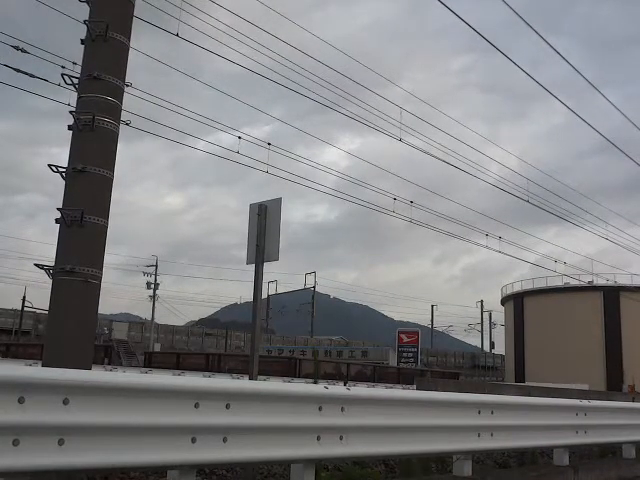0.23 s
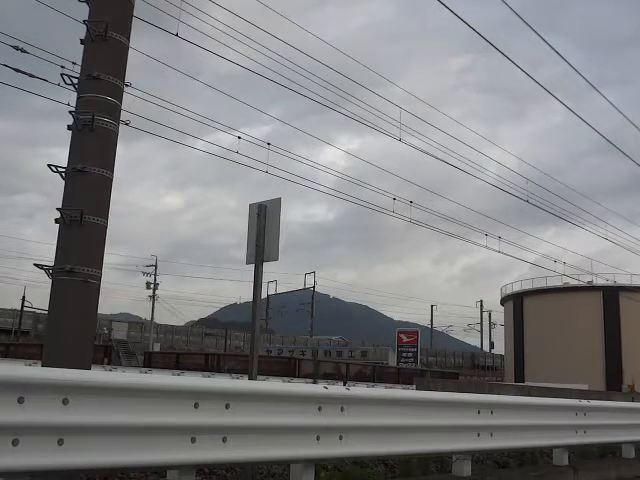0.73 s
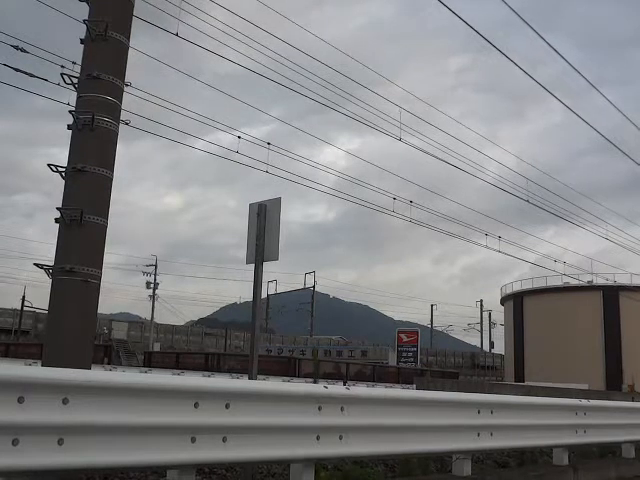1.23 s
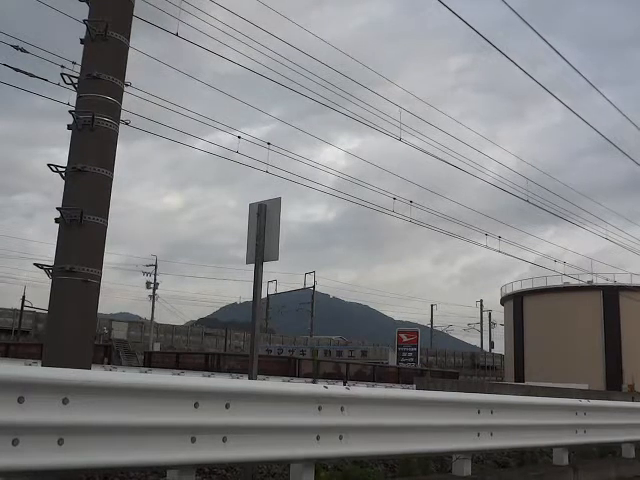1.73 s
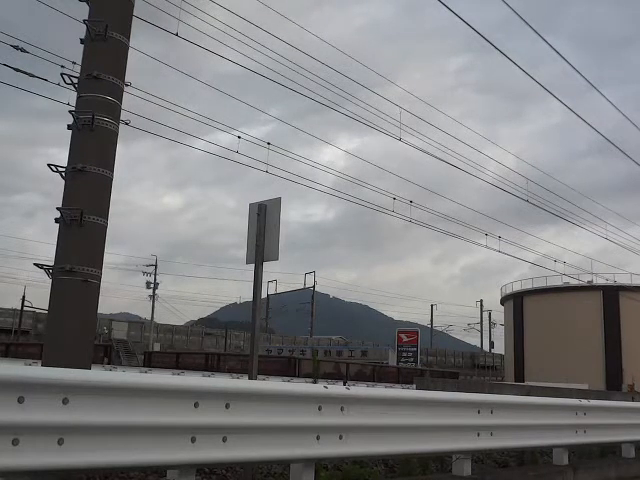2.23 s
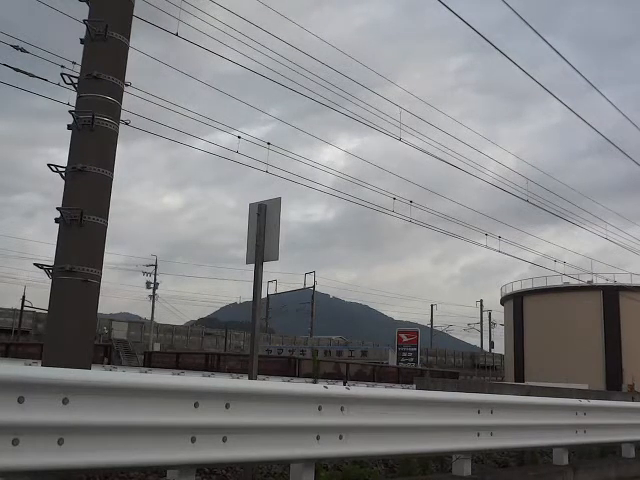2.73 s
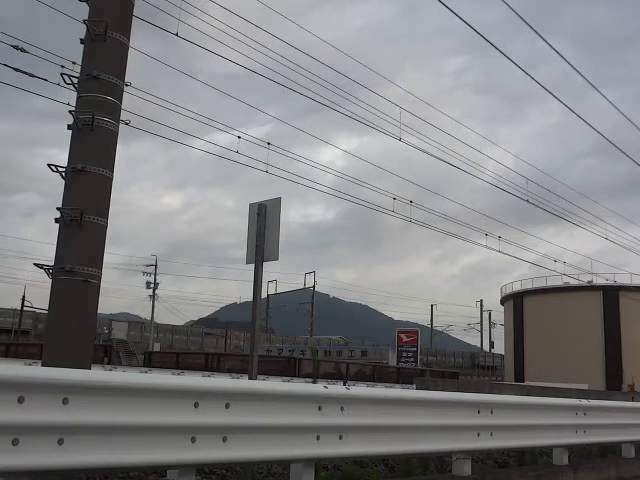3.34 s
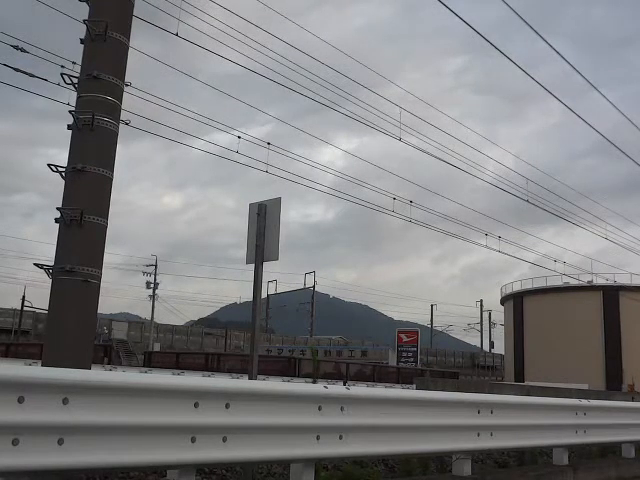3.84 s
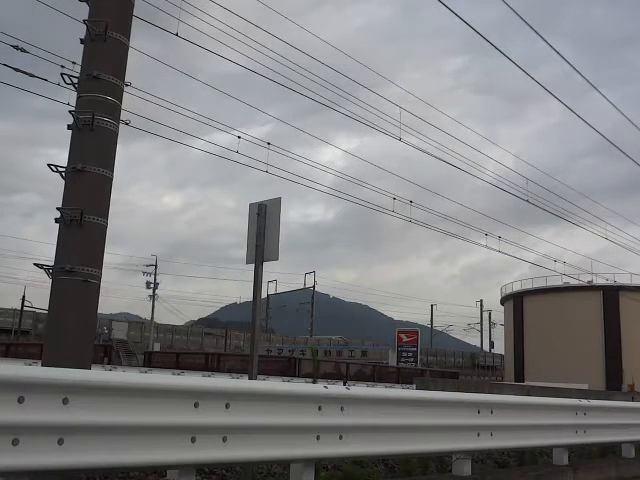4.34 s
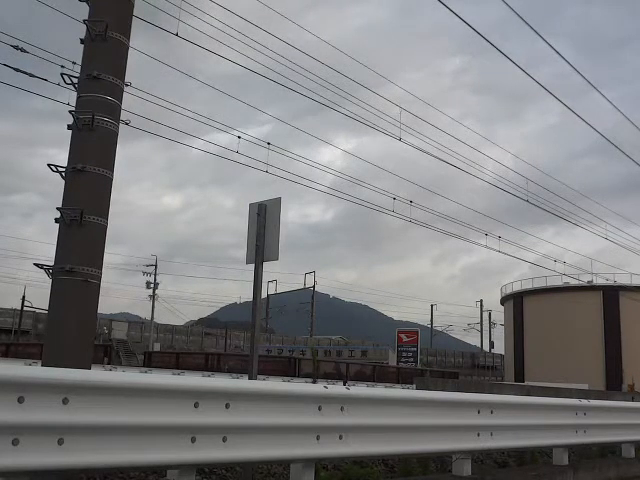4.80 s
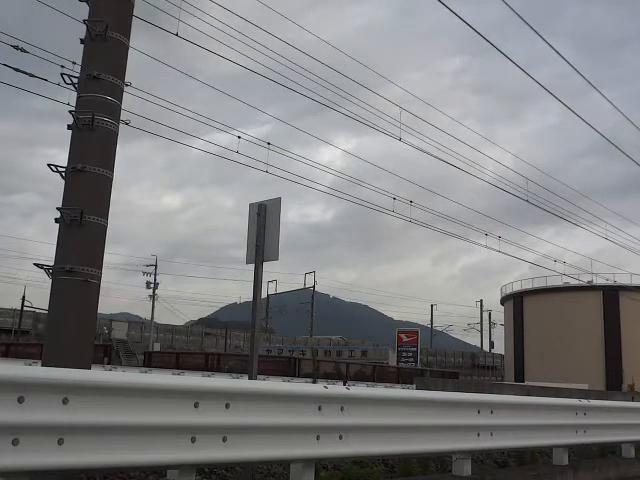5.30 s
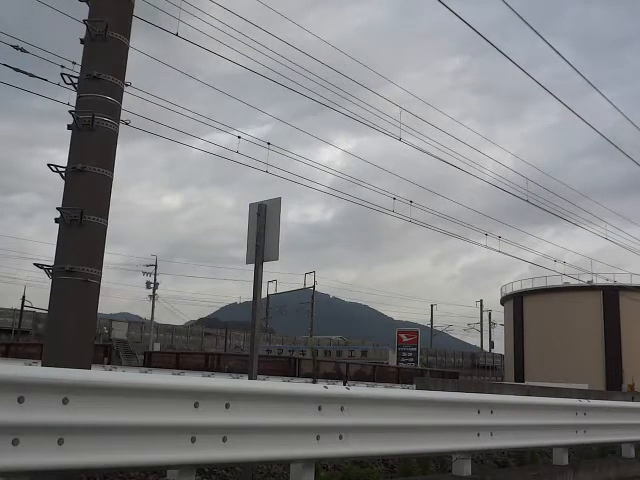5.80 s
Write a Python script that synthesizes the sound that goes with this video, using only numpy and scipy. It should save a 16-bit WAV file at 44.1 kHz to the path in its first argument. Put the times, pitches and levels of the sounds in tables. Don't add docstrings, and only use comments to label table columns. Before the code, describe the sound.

From 0 to about 6 seconds, a wide, steady chorus of distant cicadas blurs into bright hissing noise, with hardly any change. A nearer cicada throbs higher up, about four pulses a second and fading until 1.3, then about seven a second, growing until 2.0; it returns at 2.6 and fades away by 4.9. Far beneath, a diesel idles with uneven low puffs, rising slightly in speed early on, strongest around 2.2 and 3.6 and weakening at the end, with a very faint whine from 1.0 to 1.6. Soft traffic rumble and a light breeze surround it. Close, dry handling sounds stand out: a faint tick at 0.4, a crisp plastic snap at 1.1, bright ticks at 2.4, a loose button's click and rapid bounces at 2.5, a light rub and tick near 3.2, then muffled low bumps at 3.95, 4.4 and 4.7 to 4.8.

```python
import sys
import numpy as np
from scipy import signal
from scipy.fft import rfft, irfft
from scipy.io import wavfile
from scipy.ndimage import uniform_filter1d

SR = 44100
rng = np.random.default_rng(int(sys.argv[2]) if len(sys.argv) > 2 else 0)


def voltage_ratio(decibels):
    exponent = np.asarray(decibels, float) / 20
    return 10 ** exponent


def waveform_to_disk(signal):
    frames = np.transpose(np.atleast_2d(signal))
    scaled = np.clip(frames, -1, 1) * 32767
    samples = np.round(scaled).astype(np.int16)
    wavfile.write(sys.argv[1], SR, samples)


N = 267246

# time in seconds, level of its strongest tone in dB.
ENGINE_LEVEL = [(0, -50), (1.4, -47.5), (2.15, -44.5), (2.7, -50), (3.3, -51), (3.6, -46), (4.4, -51),
                (5.1, -52.5), (6.06, -57)]


def evened(x):
    return x / np.sqrt(np.mean(x ** 2) + 1e-20)


def read(points, hz):
    f, value = np.transpose(points)
    return np.interp(np.log(hz + 1), np.log(f + 1), value)


def curves(rows):
    s, *columns = np.transpose(rows)
    return [np.interp(np.arange(N) / SR, s, column) for column in columns]


def add(mix, s, sound):
    part = mix[round(s * SR):][:len(sound)]
    part += sound[:len(part)]


def resonate(x, hz, width):
    turn = np.exp(2j * np.pi * np.cumsum(hz * np.ones(len(x))) / SR)
    memory = np.exp(-np.pi * width / SR)
    smooth = signal.lfilter([1 - memory], [1, -memory], x / turn + 1e-18)
    return 2 * (turn * smooth).real


def ring(modes, rise, size=5000):
    t = np.arange(size) / SR
    sines = sum(voltage_ratio(db - 60 * t / t60) * np.sin(2 * np.pi * (hz * t + rng.random()))
                for hz, db, t60 in modes)
    return sines * (1 - np.exp(-(t / rise) ** 2))


def hiss(colour, patchy_db, swell_db, size=512):
    # frequency in Hz, likeness of left and right (1 = the same).
    likeness = [(60, 1), (130, 1), (270, 0.85), (570, 0.18), (1190, 0.1), (2520, 0.84), (5320, 0.88),
                (11200, 0.73)]
    # frequency in Hz, left louder than right in dB.
    balance = [(60, -2.5), (170, 2), (490, 0.4), (1390, -0.5), (3950, -2.2), (11200, -1.5)]
    frames, hz = 4 * N // size + 5, np.fft.rfftfreq(size, 1 / SR)
    a, b, c, d, patches = rng.standard_normal((frames, len(hz), 5)).T
    flutter = evened(uniform_filter1d(patches[0], size=8192 // size))
    patches = uniform_filter1d(patches, size=size // 64, axis=0)
    patches = evened(uniform_filter1d(patches, size=12288 // size, axis=1))
    same = np.clip(read(likeness, hz), -1, 1)[:, None]
    left, other = a + 1j * b, c + 1j * d
    z = np.array([left, same * left + np.sqrt(1 - same ** 2) * other])
    z *= voltage_ratio(np.array([.5, -.5])[:, None, None] * read(balance, hz)[:, None])
    z *= voltage_ratio(read(colour, hz)[:, None] + patchy_db * patches + swell_db * flutter)
    return evened(signal.istft(z, nperseg=size, noverlap=3 * size // 4)[1][:, :N])


def wind():
    # frequency in Hz, level in dB per Hz.
    breeze = [(8, -28), (25, -9), (70, 0), (130, -8), (400, -60)]
    hz = np.fft.rfftfreq(N, 1 / SR)
    spectrum = rfft(rng.standard_normal((2, N))) * voltage_ratio(read(breeze, hz))
    return voltage_ratio(-64) * evened(irfft(spectrum, N))


def traffic():
    # frequency in Hz, level in dB per Hz.
    rumble_colour = [(8, -23), (20, -1.5), (43, -10), (87, -4), (180, -5.5), (296, -8.5), (338, -14),
                     (520, -21.5), (680, -39), (1140, -100)]
    road_colour = [(210, -26), (350, -12), (526, -4.5), (581, -1), (744, -2), (874, -1), (1710, -7.5),
                   (1890, -9), (2200, -3), (2860, -12.5), (4840, -120)]
    near_db = curves(ENGINE_LEVEL)[0]
    near_db = near_db - near_db.mean()
    rumble = voltage_ratio(-48.5 + 0.22 * near_db) * hiss(rumble_colour, patchy_db=.6, swell_db=0.5, size=2048)
    road = voltage_ratio(-57.5 + 0.17 * near_db) * hiss(road_colour, patchy_db=0.3, swell_db=1.24)
    return rumble + road


def gear_whine():
    start_s, length_s, hz, edge_s = .97, .6, 1194, .06
    t = np.arange(N) / SR
    outside = np.maximum(np.maximum(start_s - t, t - start_s - length_s), 0)
    tone = resonate(resonate(rng.standard_normal(N), hz, 30), hz, 30)
    return voltage_ratio(-68.5 - 20 * outside / edge_s) * evened(tone)


def engine(waver_db=3.0, smear=0.41, gap=.42):
    # time in seconds, engine cycles per second.
    cycle_speed = [(0, 16.2), (.5, 16.2), (1.4, 16.57), (1.9, 16.7), (2.8, 16.79), (4.6, 16.79),
                   (6.06, 16.5)]
    # multiple of the cycle, level in dB.
    early_tones = [(1, -26), (2, -18), (3, -13), (4, -7), (5, -13), (6, -16), (7, -5), (8, -16), (9, -12),
                   (10, -3), (11, -16), (12, 0), (13, -8), (14, -15), (15, -12), (16, -22)]
    steady_tones = [(1, -17), (2, -15), (3, -10), (4, -8), (5, -7), (6, -15), (7, -5), (8, -12), (9, -6),
                    (10, -9), (11, -16), (12, 0), (13, -8), (14, -10), (15, -17), (16, -18)]
    (speed,), (level_db,) = curves(cycle_speed), curves(ENGINE_LEVEL)
    turns, t, out = np.cumsum(speed) / SR, np.arange(N) / SR, np.zeros((2, N))
    settled = np.clip(t - 1, 0, 1)
    for (k, early_db), (_, steady_db) in zip(early_tones, steady_tones):
        db = early_db + settled * (steady_db - early_db) - 2 * (k != 12)
        waver, slip = (np.interp(t, np.arange(20) * 0.322, row) for row in rng.standard_normal((2, 20)))
        apart = 0.034 * rng.standard_normal() * np.array([[1], [-1]])
        puffs = np.angle(1 + np.exp(-2j * np.pi * k * gap))
        out += voltage_ratio(db + waver_db * waver) * np.cos(2 * np.pi * k * turns + puffs + smear * slip + apart)
    return np.sqrt(2) * voltage_ratio(level_db) * out + gear_whine()


def snap(out):
    # frequency in Hz, level in dB, time to fall 60 dB in seconds.
    catch_modes = [(2750, 0, .014), (4950, 0, .011), (3550, -8, .011), (4250, -23, .05), (2880, -22, .06),
                   (9800, -16, .016), (10400, -16, .016), (7300, -22, .014), (900, -35, .06),
                   (1500, -32, .06), (1790, -34, .06), (2200, -22, .02)]
    start_s, rise_s = 1.1153, .0024
    t = np.arange(3000) / SR
    add(out, start_s, ring(catch_modes, rise_s))
    burst = np.minimum((t / rise_s) ** 2, 1) * rng.standard_normal(len(t))
    add(out, start_s, voltage_ratio(-14 - 60 * t / .022) * burst)


def tap_list():
    # time in seconds, ring level in dB, ring pitch in Hz, crack level in dB, low knock level in dB.
    finger_ticks = [
        (.398, -38, 2000, -53, -62),
        (2.3982, -22, 3860, -29, -42),
        (2.404, -35, 2790, -42, -46),
        (2.441, -20, 5080, -24.5, -49),
        (3.177, -37, 8900, -38, -61),
    ]
    tick_t60 = 0.012
    land_s, button_hz, crack_db, knock_db = 2.4863, 3290, -29.5, -51
    rows = [(s, db, hz, tick_t60, crack, knock) for s, db, hz, crack, knock in finger_ticks]
    rows.append((land_s, -4, button_hz, .0046, crack_db, knock_db))
    waits = np.cumsum(.0067 * .8 ** np.arange(3))
    for k, wait in enumerate(waits):
        change_db = -3.5 * k
        rows.append((land_s + wait, -19 + change_db, button_hz, tick_t60,
                     crack_db + change_db - 1, knock_db + change_db))
    return rows


def taps(out):
    # frequency in Hz, level in dB, time to fall 60 dB in seconds.
    shell_modes = [(800, 0, .08), (1550, -3, .06), (1150, -14, .02), (2050, -10, .02)]
    t = np.arange(3000) / SR
    for s, ring_db, hz, t60, crack_db, knock_db in tap_list():
        add(out, s, ring([(hz, ring_db, t60)], .0006) + voltage_ratio(knock_db) * ring(shell_modes, .0015))
        crack = evened(resonate(resonate(rng.standard_normal(len(t)), 6600, 9300), 6800, 9300))
        add(out, s, voltage_ratio(crack_db - 60 * t / 0.022) * np.minimum(t / 0.0012, 1) * crack)


def rubs(out):
    # time in seconds, level in dB, centre in Hz, width in Hz, length in seconds.
    finger_rubs = [(1.119, -42, 760, 700, 0.029), (1.121, -36, 3400, 2500, 0.033),
                   (1.485, -46, 500, 1600, 0.021), (2.347, -38.5, 310, 160, 0.013),
                   (2.36, -50.5, 7000, 6000, 0.056), (2.396, -43, 4000, 6000, 0.039),
                   (2.444, -43.5, 5800, 7100, 0.064), (2.497, -43, 4900, 220, 0.064),
                   (2.501, -44, 3160, 400, 0.057), (2.775, -54, 483, 800, 0.01),
                   (3.151, -42, 371, 40, 0.035), (3.153, -48, 477, 300, 0.048),
                   (3.154, -50, 900, 900, 0.05), (3.165, -46, 990, 900, 0.028),
                   (3.166, -45, 9200, 2778, 0.018)]
    t = np.arange(3000) / SR
    for s, db, hz, width, length in finger_rubs:
        slips = rng.standard_normal(len(t)) * (0.25 + (rng.random(len(t)) < 600 / SR))
        climbing_hz = hz * (1 + 0.45 * t)
        scrape = evened(resonate(resonate(slips, hz, width), climbing_hz, width))
        add(out, s, voltage_ratio(db) * scrape * np.minimum(t / 0.0029, 1) * np.exp(-(t / length) ** 2))


def bumps(out):
    # time in seconds, peak level in dB, frequency in Hz, length in cycles.
    pushes = [
        (3.95, -39, 30, 1.2),
        (4.435, -33, 28, 1.0),
        (4.711, -33, 80, 1.0),
        (4.781, -29, 90, 1.6),
    ]
    t = np.arange(3000) / SR
    for s, db, hz, cycles in pushes:
        u = (t - t.mean()) * hz
        push = -voltage_ratio(db) * np.sin(2 * np.pi * u + 0.55) * np.exp(-(2 * u / cycles) ** 2)
        add(out, s - t.mean(), push)


def handling():
    out = np.zeros(N)
    snap(out)
    taps(out)
    rubs(out)
    bumps(out)
    return out * voltage_ratio(np.array([[-.3], [.3]]))


def soloist():
    # frequency in Hz, level in dB per Hz.
    solo_colour = [(3710, -42), (6300, -30), (6450, -21), (7140, -1), (7610, -3.5), (9500, -1.5),
                   (9930, -1.5), (11200, -19), (11400, -26), (11600, -75), (15100, -105), (22000, -120)]
    # first throb in seconds, end in seconds, period in seconds, first level in dB, fade in dB/s.
    phrases = [
        (-.022, 1.33, .256, -46.5, -4.5),
        (1.386, 2.0, .134, -52, 2),
        (2.558, 4.9, .142, -54, -6),
    ]
    half_share = 0.26
    t, effort = np.arange(N) / SR, np.zeros(N)
    for first, end, period, db, fade in phrases:
        for s in np.arange(first, end, period):
            throb = np.exp(-((t - s) / (half_share * period)) ** 2)
            effort += voltage_ratio(db + fade * (s - first)) * throb
    return effort * hiss(solo_colour, patchy_db=1.5, swell_db=4.0)


def chorus():
    # frequency in Hz, level in dB per Hz.
    low_colour = [(880, -37), (1500, -42), (1950, -18), (2300, -6.5), (2650, -5), (3000, 0), (3200, 1),
                  (3400, -1.5), (3600, -6), (4400, -14), (8000, -100)]
    high_colour = [(2000, -29.5), (3400, -7.5), (3620, -3), (4660, 3), (5830, -5), (6490, -26), (6800, -11),
                   (8840, -38), (15000, -120)]
    fizz_colour = [(3650, -20), (6200, 1.5), (6650, -5), (7490, 1), (9300, -1), (10000, -13), (10500, -16),
                   (11000, -27), (11500, -28), (22000, -100)]
    t = np.arange(N) / SR
    low = voltage_ratio(-46 - .2 * t) * hiss(low_colour, patchy_db=0.65, swell_db=0.62)
    high = voltage_ratio(-44 + 0.07 * t) * hiss(high_colour, patchy_db=0.7, swell_db=0.04)
    fizz = voltage_ratio(-51.5 - 0.33 * t) * hiss(fizz_colour, patchy_db=1.53, swell_db=-0.4)
    return low + high + fizz


def scene():
    return wind() + traffic() + engine() + handling() + soloist() + chorus()


def low_pass(x):
    return signal.sosfilt(signal.butter(12, 11840, fs=SR, output="sos"), x)


def record(dry):
    low_cut = signal.sosfilt(signal.butter(2, 16, "high", fs=SR, output="sos"), dry)
    edge = signal.firwin(801, 11030, window=("kaiser", 7), fs=SR)[None]
    return low_pass(signal.oaconvolve(low_cut, edge, "same"))


dry = scene()
out = record(dry)
waveform_to_disk(out)
```